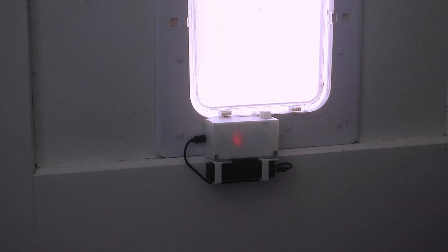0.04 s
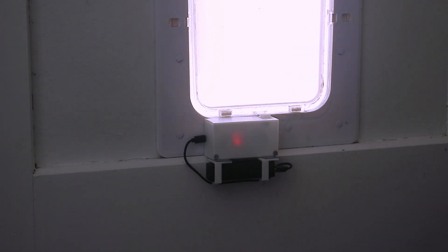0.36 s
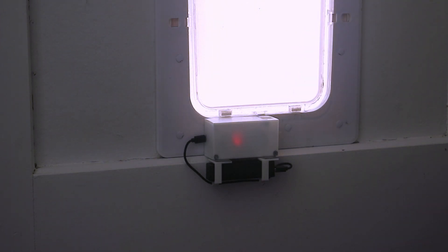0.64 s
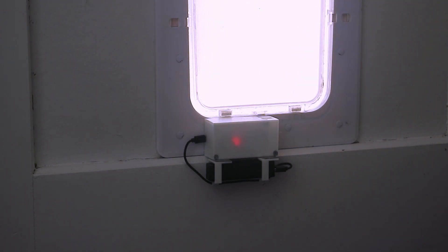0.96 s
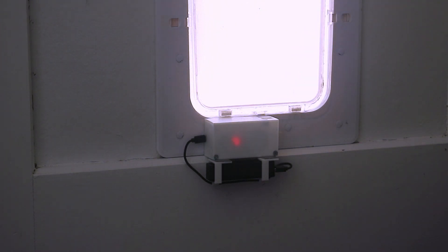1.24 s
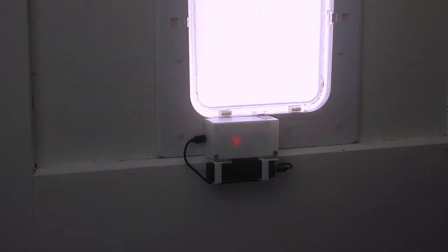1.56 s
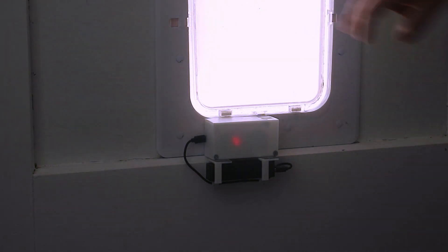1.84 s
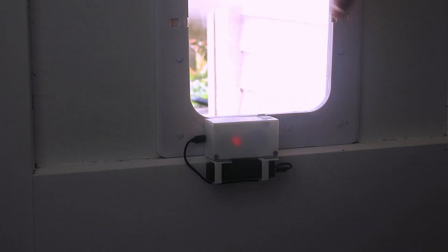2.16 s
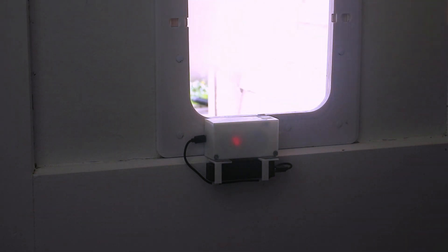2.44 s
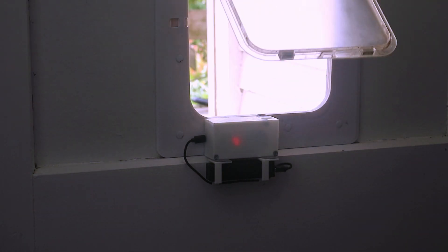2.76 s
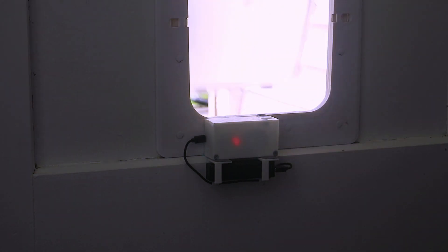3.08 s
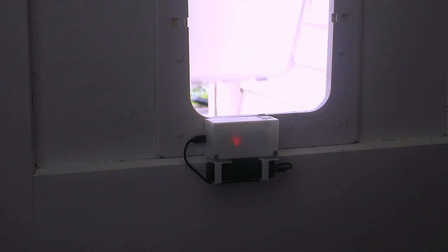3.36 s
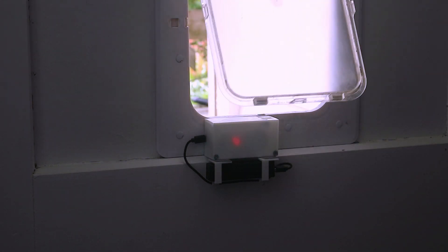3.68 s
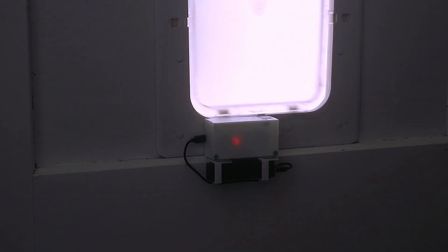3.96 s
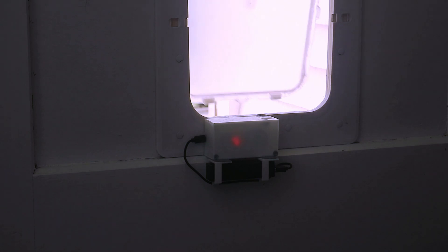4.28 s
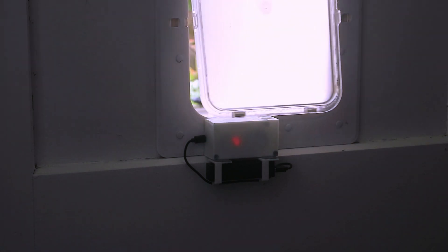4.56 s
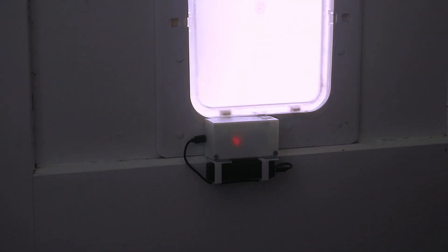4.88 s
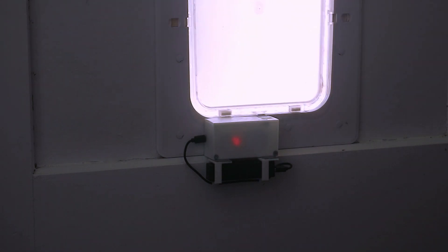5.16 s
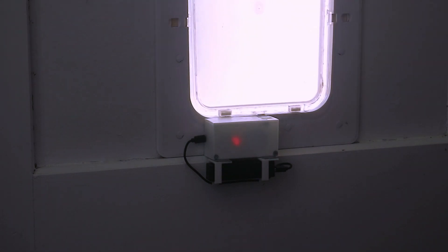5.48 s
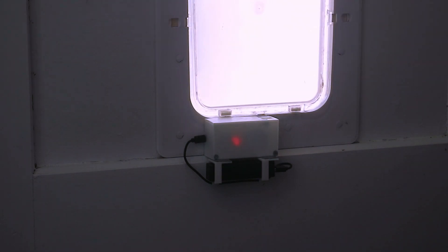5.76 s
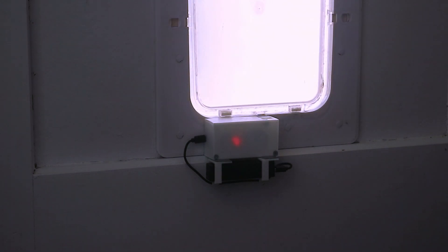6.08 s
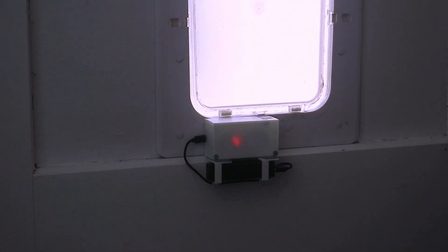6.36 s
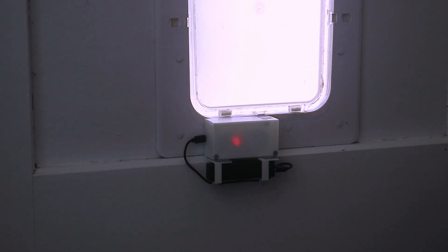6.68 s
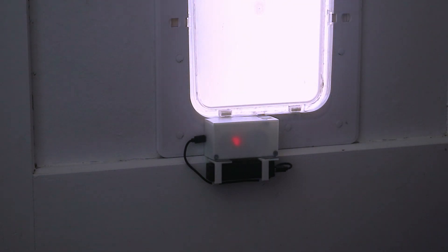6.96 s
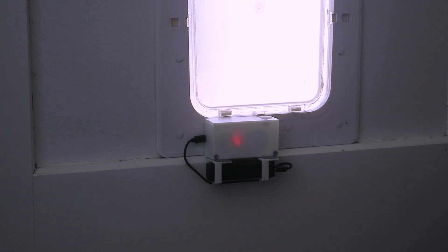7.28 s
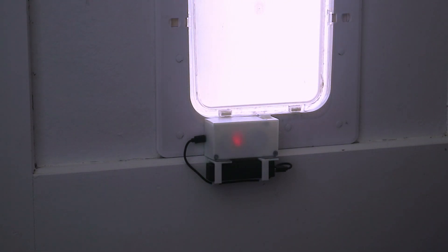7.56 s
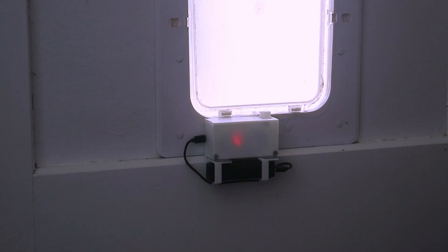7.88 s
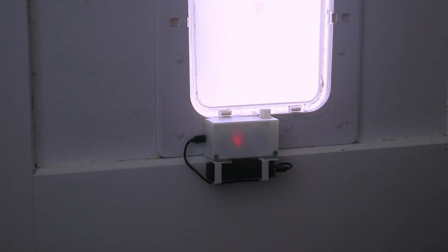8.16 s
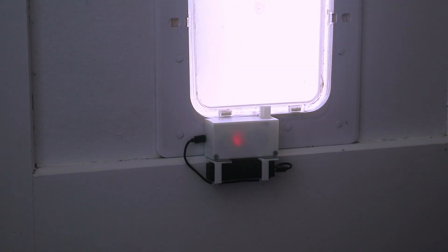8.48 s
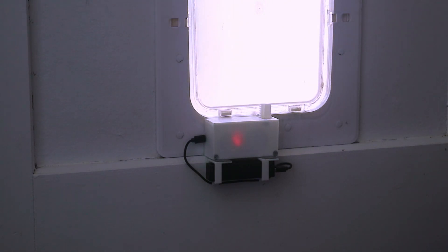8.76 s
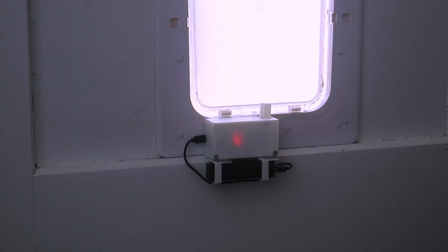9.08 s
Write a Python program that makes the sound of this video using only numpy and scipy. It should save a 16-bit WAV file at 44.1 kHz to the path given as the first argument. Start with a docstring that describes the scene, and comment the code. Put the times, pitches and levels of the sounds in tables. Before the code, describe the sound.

In a quiet room a small lock motor hums faintly and stops with a tick. A plastic cat flap is shoved open with a hollow thud and swings back and forth, clacking through its frame five times while the hinge rubs and briefly groans. It rattles to rest. After a pause the motor hums again and ends in a small click. Soft room air and a faint steady whir lie underneath, heard in stereo.

```python
"""A small lock motor hums in a quiet room, drawing down the bolt of a plastic cat flap.
After a faint scuff the flap is shoved off its catch with a thud and swings in its door frame. The hinge
rubs on every swing and sometimes groans; at the bottom the flap clacks past the catch, chatters and
sways the door. It rattles to rest, and the motor raises the bolt until it clicks.
Two microphones hear it over still room air, a few soft tocks and the whir of the camera's body."""
import sys
import numpy as np
from scipy import signal
from scipy.fft import rfft, irfft
from scipy.io import wavfile
from scipy.ndimage import map_coordinates

SR = 44100
rng = np.random.default_rng(int(sys.argv[2]) if len(sys.argv) > 2 else 0)


def transcribe(u):
    """Save the signal u as a 16-bit wav file named by the first command-line argument.

    u: samples, shape (n,) or (channels, n), limited to [-1, 1]; the rate is SR.
    q: integer samples, one column per channel.
    """
    v = np.clip(np.atleast_2d(u).T, -1, 1)
    q = np.round(v * 32767).astype(np.int16)
    wavfile.write(sys.argv[1], SR, q)


N = 402633
TIME = np.arange(N) / SR
DOOR_HZ = 37.99  # lowest mode of the door
SHOVE_S = 2.0684

# where the flap's sound sits between the microphones: (frequency [Hz], left minus right [dB])
PANEL_BALANCE = [(90.0, 4.5), (160.0, -4), (270.0, -23), (450.0, -4.5), (800.0, 1), (1500.0, 0.5)]
# the flap's swings, from one turning point to the next: (start [s], end [s], rubbing level [dB])
SWING_SPANS = [(2.128, 2.49, -44), (2.452, 2.892, -36), (2.995, 3.366, -37), (3.403, 3.883, -38),
               (3.919, 4.343, -40.5), (4.313, 4.765, -40), (4.811, 5.454, -50)]
# its passes through the frame: (time [s], first clack [dB], second clack [dB], hardness [dB/octave],
# loss per rebound [dB], door sway [dB])
FRAME_PASSES = [(2.644, -25, -43, -1, 3, -63), (3.1312, -28, -29.5, 0.94, 11, -54),
                (3.6054, -27.5, -29, -0.44, 6, -51.5), (4.081, -28.5, -30.5, 0.66, 1.5, -49),
                (4.5341, -29, -33.5, 0.3, 1.5, -50)]


def amp(db):
    """Decibels to amplitude."""
    return 10 ** (np.asarray(db) / 20)


def unit(x):
    """Scale to unit RMS."""
    return x / np.sqrt(np.mean(abs(x) ** 2) + 1e-20)


def curve(points, hz):
    """Interpolate (frequency, value) points along log frequency."""
    f, value = np.transpose(points)
    return np.interp(np.log(hz + 1), np.log(f + 1), value)


def octaves(hz, knee_hz=800):
    """Octaves above the knee where a harder contact starts to sound brighter."""
    return np.log2(np.maximum(hz / knee_hz, 1))


def resonance_db(hz, centre_hz, width_hz):
    """One broad peak, 6 dB down at the edges of its width."""
    return -20 * np.log10(1 + (2 * (hz - centre_hz) / width_hz) ** 2)


def add(mix, s, sound):
    """Mix a sound in at s seconds."""
    part = mix[:, max(round(s * SR), 0):][:, :sound.shape[-1]]
    part += sound[..., :part.shape[1]]


def drift(count, size):
    """Random wander of unit RMS, smoothed over about size samples."""
    noise = rng.standard_normal(count + 2 * size)
    return unit(signal.oaconvolve(noise, signal.windows.hann(2 * size + 1), "valid"))


def tone(hz):
    """A sine of unit RMS that follows a moving pitch."""
    return np.sqrt(2) * np.sin(2 * np.pi * np.cumsum(hz) / SR)


def causal(gain):
    """The most compact pulse with this spectrum, silent before it starts."""
    spectrum = np.exp(np.conj(signal.hilbert(np.log(gain))))
    return np.fft.ifft(spectrum).real[..., :gain.shape[-1] // 2]


def colour(x, db_at, size=16384):
    """A causal filter of unit power gain, shaped by a dB curve."""
    hz = abs(np.fft.fftfreq(size, 1 / SR))
    gain = np.maximum(unit(amp(db_at(hz))), 1e-5)
    return signal.oaconvolve(x, np.atleast_2d(causal(gain)), axes=1)[:, :x.shape[1]]


def stereo_noise(size, diffuseness=1):
    """White noise at the two microphones: shared in the bass, less so in the treble."""
    # likeness of the microphones for sound from the door: (frequency [Hz], coherence [0-1])
    coherence = [(90, 0.98), (160, 0.8), (600, 0.84), (2000, 0.49), (5000, 0.1)]
    left, other = rfft(rng.standard_normal((2, size)))
    alike = np.clip(curve(coherence, np.fft.rfftfreq(size, 1 / SR)), 0, 1) ** diffuseness
    right = alike * left + np.sqrt(1 - alike ** 2) * other
    return irfft(np.array([left, right]), size)


def ring(t60, room_db, crack_db, damping=0.12, bite=0.36, bite_s=0.0019, size=32768, count=4):
    """One blow: cracks off the frame, dense ringing that dies sooner in the treble, the room's tail."""
    # reverberation of the room: (frequency [Hz], t60 [s])
    room_decay = [(95, 1), (212, 0.85), (424, 0.51), (1700, 0.37), (6900, 0.43)]
    hz, t, noise = signal.stft(stereo_noise(size), SR, nperseg=256)
    hz = hz[:, None]
    plastic = amp(-60 * t / t60 * (1 + damping * octaves(hz)))
    contact = bite * np.minimum(octaves(hz, 1900), 1) * np.exp(-t / bite_s)  # a brief spit of treble
    room = amp(room_db - 60 * t / curve(room_decay, hz))
    out = signal.istft(noise * np.hypot(plastic + contact, room), SR, nperseg=256)[1][:, :size]
    order = np.arange(count)
    slots = order + rng.random(count) * np.minimum(order, 1)
    arrivals = (slots / count * 0.009 * SR).astype(int)  # within the first 9 ms
    cracks = amp(crack_db) * rng.choice([-1, 1], count) / np.sqrt(order + 1)
    for side in out:
        side[arrivals + rng.integers(0, 4, count)] += cracks
    return out


def room_air(level_db=-63, drone_hz=565, width_hz=110, drone_db=8, right_db=3):
    """Soft room tone with one broad drone; its low part leans to the right microphone."""
    # still air of the room: (frequency [Hz], relative level [dB])
    air_spectrum = [(20, -21), (45, -6.5), (110, -3), (900, -1.5), (1300, -6.5), (3500, -15), (6000, -21),
                    (10000, -28.5), (12500, -33.5), (14000, -54)]

    def shape_db(hz):
        drone = drone_db * np.exp(-(2 * (hz - drone_hz) / width_hz) ** 2)
        lean = np.array([[-.5], [.5]]) * right_db / (1 + (hz / 900) ** 2)
        return curve(air_spectrum, hz) + drone + lean
    return amp(level_db) * colour(stereo_noise(N, diffuseness=6.6), shape_db)


def electronics_whine(hz=15230, waver_hz=25, level_db=-97.5):
    """The electronics give a faint, unsteady line at the top of hearing."""
    return amp(level_db) * tone(hz + waver_hz * drift(N, size=400))


def camera_whir(level_db=-57, right_db=1):
    """A steady whir in the camera's body shakes the two microphones in opposite directions."""
    # vibration of the body: (frequency [Hz], relative level [dB])
    whir_spectrum = [(30, -30), (190, -0.5), (480, -3), (525, 8.5), (605, -1.5), (650, -5), (2200, -21.5),
                     (12000, -49)]
    whir = colour(rng.standard_normal((1, N)), lambda hz: curve(whir_spectrum, hz))
    return whir * amp(level_db) * np.array([amp([-right_db]), -amp([right_db])])


def tocks(width_hz=260):
    """Dull taps, each ringing in one broad resonance."""
    # soft hollow taps: (time [s], level [dB], pitch [Hz])
    taps = [(.066, -55.5, 940), (.934, -60, 530), (6.349, -56.5, 950), (8.35, -57, 900)]
    out = np.zeros((2, N))
    for s, db, pitch_hz in taps:
        tap = ring(t60=0.24, room_db=-24, crack_db=-5)
        add(out, s, amp(db) * colour(tap, lambda hz: resonance_db(hz, pitch_hz, width_hz), size=4096))
    return out


def scuff(s=1.596, level_db=-65.5, centre_hz=3300, skirt_db=6.5, rise_s=0.015, size=8192):
    """A dry brush of treble noise that swells quickly and fades."""
    out = np.zeros((2, N))
    age = np.arange(size) / SR / rise_s
    brush = colour(stereo_noise(size), lambda hz: -skirt_db * np.log2((hz + 1) / centre_hz) ** 2, 1024)
    add(out, s, amp(level_db) * brush * age * np.exp(1 - age))
    return out


def lock_motor(waver=0.00481, ramp_s=0.022, gear_hz=2150, gear_width_hz=134, gear_db=-7.5):
    """Wavering hum, whirr and singing gears while the bolt moves; lifting it adds a rumble."""
    # bolt down, then up: (start [s], end [s], hum [dB], whirr [dB], rumble [dB])
    runs = [(-.1, 0.996, -65.5, -73.5, -95), (7.248, 9.065, -68.5, -71, -73.5)]
    # tones of the motor: (frequency [Hz], relative level [dB])
    hum_tones = [(247.6, -3.5), (710.6, -18)]
    # noise of the gears: (frequency [Hz], relative level [dB])
    whirr_spectrum = [(60, -28), (300, -13), (900, -8), (1300, -10.5), (2400, -5.5), (2900, -16),
                      (5000, -28), (12000, -48)]
    speed = 1 + waver * drift(N, size=4000)
    hum = amp([[-5], [3]]) * sum(amp(db) * tone(hz * speed) for hz, db in hum_tones)  # to the right
    noise = stereo_noise(N, diffuseness=8.5)
    gears = colour(noise, lambda hz: -10 * np.log10(1 + (2 * (hz - gear_hz) / gear_width_hz) ** 4))
    whirr = colour(noise, lambda hz: curve(whirr_spectrum, hz)) + amp(gear_db) * gears
    rumble = colour(noise, lambda hz: resonance_db(hz, centre_hz=125, width_hz=60))
    out = np.zeros((2, N))
    for start, end, hum_db, whirr_db, rumble_db in runs:
        running = np.clip(np.minimum(TIME - start, end - TIME) / ramp_s, 0, 1)
        out += running * (amp(hum_db) * hum + amp(whirr_db) * whirr + amp(rumble_db) * rumble)
    return out


def lock_clicks():
    """Small clicks ring in the lock's plastic housing."""
    # contacts in the lock: (time [s], level [dB], hardness [dB/octave])
    ticks = [(0.934, -53.5, -8), (7.244, -55, -13), (7.346, -57, -2.5), (9.019, -43.5, -4),
             (9.028, -46, -3), (9.037, -47.5, 0)]
    # colour of the housing: (frequency [Hz], relative level [dB])
    housing = [(100, -24), (400, -1), (680, -8.5), (880, 8), (1150, -7), (1700, -1.5), (2200, 1),
               (2750, -7.5), (3400, -14.5), (13000, -37)]
    out = np.zeros((2, N))
    for s, db, hardness_db in ticks:
        click = ring(t60=0.1, room_db=-11.5, crack_db=17)
        tilt = amp(hardness_db * octaves(np.fft.rfftfreq(click.shape[1], 1 / SR)))
        add(out, s, amp(db) * irfft(rfft(click) * tilt)[:, :SR // 2])
    return colour(out, lambda hz: curve(housing, hz))


def door_sway(rise_s=0.092, waver_hz=0.39, settle_at_s=4.965, settle_length_s=0.39, settle_db=-47):
    """The door's lowest mode swells and dies with each pass, and again as the flap settles."""
    swell = np.zeros((2, N))
    age = np.arange(SR) / SR / rise_s
    for s, *_, sway_db in FRAME_PASSES:
        add(swell, s, amp(sway_db) * age * np.exp((1 - age ** 2) / 2))
    add(swell, settle_at_s, amp(settle_db) * signal.windows.tukey(round(settle_length_s * SR), .9))
    return swell * tone(DOOR_HZ + waver_hz * drift(N, size=6000))


def lingering_tones(source, left_db=-12, waver_hz=1.32):
    """Low resonances store some of the flap's energy and let it go slowly."""
    # tones that hang in the room: (frequency [Hz], t60 [s], gain [dB])
    resonances = [(185.6, 2.27, -19.5), (228.3, 1.18, -15), (347.6, 1.52, -19)]
    power = (source ** 2).mean(0)
    out = np.zeros(N)
    for hz, t60, db in resonances:
        retained = amp(-60 / (t60 * SR)) ** 2
        stored = signal.lfilter([1 - retained], [1, -retained], power)
        out += amp(db) * np.sqrt(stored / 2) * tone(hz + waver_hz * drift(N, size=4000))
    return amp([[left_db], [0]]) * out


def hinge_groans(jitter=0.05, roughness=0.35, left_db=-9, right_db=7):
    """As the flap turns back, uneven slips lock for a moment into a rough falling tone."""
    # groans: (time [s], length [s], start pitch [Hz], end pitch [Hz], level [dB], second harmonic [dB])
    groans = [(2.474, 0.066, 283, 249, -47, 2.5), (2.528, 0.056, 264.5, 244, -42.5, -12),
              (2.975, 0.078, 256, 224, -40.5, -13), (3.404, 0.073, 267, 225, -43.5, -9.5)]
    out = np.zeros((2, N))
    for s, length, start_hz, end_hz, db, octave_db in groans:
        n = round(length * SR)
        hz = np.linspace(start_hz, end_hz, n) * (1 + jitter * drift(n, size=120))
        grip = (1 + roughness * drift(n, size=120)) * signal.windows.tukey(n, .9)
        groan = grip * (tone(hz) + amp(octave_db) * tone(2 * hz))
        add(out, s, amp([[db + left_db], [db + right_db]]) * groan)
    return out


def rubbing_force(attack_s=0.074, sag_db_per_s=6.5, release_s=0.15):
    """Rubbing builds as the flap gathers speed, eases through the swing and dies as it climbs."""
    force = np.zeros(N)
    for start, end, db in SWING_SPANS:
        attack = np.clip((TIME - start) / attack_s, 0, 1)
        release = np.clip((end - TIME) / release_s, 0, 1) ** 2
        force += attack * release * amp(db - sag_db_per_s * np.maximum(TIME - start, 0))
    return force


def hinge_rub(slips_per_s=380, spread_db=2, spots=4):
    """A stream of tiny uneven slips, at several spots of the hinge, shakes the flap."""
    # colour of the rubbing: (frequency [Hz], relative level [dB])
    rub_spectrum = [(95, -4.5), (212, 6), (424, -2.5), (850, -1), (1700, -13.5), (6900, -26)]
    force = rubbing_force()
    out = np.zeros((2, N))
    for _ in range(spots):
        sizes = amp(spread_db * np.minimum(rng.exponential(1, N), 4)) * rng.choice([-1, 1], N)
        slips = (rng.random(N) < slips_per_s / spots / SR) * sizes
        body = ring(t60=0.11, room_db=-7, crack_db=17.5)
        body /= np.linalg.norm(body[0])
        out += signal.oaconvolve((force * unit(slips))[None], body, axes=1)[:, :N]
    return colour(out, lambda hz: curve(rub_spectrum, hz), size=4096) / np.sqrt(spots)


def swing_bend(sound, pitch_share=0.02985):
    """The resonances sag from sharp to flat over each swing."""
    lead_s = np.zeros(N)
    for start, end, _ in SWING_SPANS:
        progress = np.clip((TIME - start) / (end - start), 0, 1)
        lead_s += pitch_share * (end - start) * progress * (1 - progress)
    return np.array([map_coordinates(side, [(TIME + lead_s) * SR], order=3) for side in sound])


def strike(db, hardness_db, loss_db, bass_db=-8, body_db=0, body_hz=560, softening_db=2.47):
    """A blow on the plastic rebounds once per sway of the door, weaker and duller every time."""
    hz = abs(np.fft.fftfreq(1024, 1 / SR))
    # each contact point favours other bands of the panel
    spot_db = 0.5 * np.sin(2 * np.pi * (np.log2(hz + 300) * rng.uniform(1, 2) + rng.random()))
    hollow_db = body_db * np.exp(-np.log2((hz + 1) / body_hz) ** 2)
    blows = np.zeros((1, SR // 4))
    for rebound in range(6):
        tilt_db = (hardness_db - rebound * softening_db) * octaves(hz) + bass_db / (1 + (hz / 250) ** 2)
        pulse = amp(db - rebound * loss_db) * causal(amp(tilt_db + spot_db + hollow_db))
        delay_s = (rebound + min(rebound, 1) * rng.normal(0, 0.02)) / DOOR_HZ
        add(blows, delay_s, pulse)
    body = ring(t60=0.21, room_db=-12.5, crack_db=15.5, damping=0.22, bite=0.81, bite_s=0.0044)
    return signal.fftconvolve(blows, body, axes=1)


def boom(rise_s=0.0047, left_db=-7, right_db=2):
    """The shove sets the low modes of the held flap ringing."""
    # the flap while still pressed on the catch: (frequency [Hz], t60 [s], level [dB])
    held_modes = [(87, 0.162, -29), (218, 0.19, -24.5), (377, 0.14, -17.5), (480, 0.094, -26),
                  (1009, 0.056, -18.5)]
    t = np.arange(SR // 2) / SR
    tones = sum(amp(db - 60 * t / t60) * np.sin(2 * np.pi * hz * t) for hz, t60, db in held_modes)
    out = np.zeros((2, N))
    add(out, SHOVE_S, amp([[left_db], [right_db]]) * np.minimum(t / rise_s, 1) * tones)
    return out


def shove(thump_after_s=0.0074):
    """A hand snaps the flap off its catch and damps it; the hand's weight follows as a dull thump."""
    # colour of the held flap: (frequency [Hz], relative level [dB])
    held_spectrum = [(55, -17.5), (85, 0.5), (130, -2.5), (200, 2), (290, -5), (400, 9.5), (700, 0),
                     (980, 8), (1350, 0), (2200, -3.5), (2700, 0), (3200, -9), (7000, -22), (10500, -34),
                     (14500, -50)]
    out = np.zeros((2, N))
    add(out, SHOVE_S, strike(db=-28, hardness_db=0.43, loss_db=24, bass_db=16.5))
    add(out, SHOVE_S + thump_after_s, strike(db=-26, hardness_db=-4.5, loss_db=3.5, bass_db=6.5))
    sides = np.array([[.5], [-.5]])
    return colour(out, lambda hz: curve(held_spectrum, hz) + sides * curve(PANEL_BALANCE, hz), size=4096)


def clacks(leave_after_s=0.052, clear_after_s=0.108):
    """On each pass the flap hits the catch, leaves it and clears the frame; at last it rattles to rest."""
    # knocks from the hand after the shove, from play in the hinge and from clipping the catch: # (time [s],
    # level [dB], hardness [dB/octave], loss per rebound [dB])
    knocks = [(2.192, -30.5, -9, 4), (2.2907, -43.5, -3.5, 15), (2.3272, -42, -5.5, 9),
              (2.4147, -42.5, -7, 18), (2.5362, -35.5, -5.5, 25), (2.5623, -30.5, -4.5, 1),
              (2.669, -30.5, -1, 3.5), (3.0252, -37, -6, 22), (3.2115, -41, -3, 14), (3.2405, -37, -4, 18),
              (3.265, -35.5, -3.5, 14), (3.5238, -36.5, -6.5, 3), (3.630, -31, 0, 22),
              (4.0925, -30, -2.5, 20), (4.1584, -43, 4, 16), (4.2147, -29.5, -6.5, 21), (4.55, -36, 2, 24),
              (4.5623, -31, 1.5, 2.5), (4.625, -43, 3, 18), (4.642, -32, -0.5, 22), (4.669, -33, -1.5, 22),
              (4.855, -46.5, -15.5, 14), (4.935, -50, -8, 15)]
    # hollow rattle on the catch:
    # (time [s], level [dB], hardness [dB/octave], loss per rebound [dB], hollow body [dB])
    rattle = [(5.0116, -26.5, -5.5, 1.5, -3), (5.024, -35, 0, 24, 10.5), (5.0373, -37.5, 3.5, 5, 9),
              (5.064, -32.5, -3, 0.5, 0.5), (5.1123, -33, 0.5, 3.5, 2), (5.139, -32.5, 1.3, 5, 6.5),
              (5.176, -29, -3.5, 17, -2), (5.2187, -25.5, -4.5, 6, -0.5), (5.2873, -32, 0, 12, 4),
              (5.318, -31, -9.5, 15, 4), (5.355, -29.5, -3, 21, 0), (5.371, -31.5, -9, 13.5, 6)]
    out = np.zeros((2, N))
    for s, first_db, second_db, hardness_db, loss_db, _ in FRAME_PASSES:
        add(out, s, strike(first_db, hardness_db, loss_db))
        add(out, s + leave_after_s, strike(second_db, hardness_db, loss_db=6.5, bass_db=-4.5))
        add(out, s + clear_after_s, strike(db=-34.5, hardness_db=-7, loss_db=6.5))
    for s, db, hardness_db, loss_db in knocks:
        add(out, s, strike(db, hardness_db, loss_db))
    for s, db, hardness_db, loss_db, body_db in rattle:
        add(out, s, strike(db, hardness_db, loss_db, bass_db=-4.5, body_db=body_db, softening_db=5))
    return out


def panel_db(hz):
    """Response of flap and door at the left and right microphones."""
    # broad colour of flap and door: (frequency [Hz], relative level [dB])
    panel_spectrum = [(60, -16.5), (85, 4.5), (130, -4.5), (200, -10.5), (350, -1), (600, -7.5), (1000, -5),
                      (1500, -8), (2800, -4), (4800, -14.5), (7000, -20.5), (10500, -36.5), (14500, -56)]
    # resonances of flap, frame and door: (frequency [Hz], width [Hz], height [dB], left minus right [dB])
    modes = [(157.3, 10.5, 10.5, -13), (192, 14.6, 15.5, 5.5), (222.8, 27, 14, -3.5), (312, 17, 10.5, 4),
             (346.6, 6.8, 12, -4.5), (388.4, 20, 9, -7), (455, 17, 7, -14.5), (478.7, 27.3, 19, -0.5),
             (626.4, 17.7, 19.5, -5), (770, 42, 10.5, -12.5), (864, 12.5, 17, 6), (914, 15, 17, -6.5),
             (986, 50, 15.5, -5), (1157, 123, 13, 0), (1224, 19, 17, 3.5), (1421, 42, 8.5, 5.5),
             (1547, 43, 8, 6), (1711, 43, 15.5, 0), (1938, 33, 8.5, 8.5), (2410, 31, 4.5, -10),
             (2524, 28, 8, -1), (2767, 130, 6, 1.5), (3193, 91, 4, -1.5), (4020, 72, 5.5, 1)]
    sides = np.array([[.5], [-.5]])
    peaks = sum(amp(db + sides * pan_db) ** 2 / (1 + (2 * (hz - centre_hz) / width_hz) ** 2)
                for centre_hz, width_hz, db, pan_db in modes)
    return curve(panel_spectrum, hz) + sides * curve(PANEL_BALANCE, hz) + 10 * np.log10(1 + peaks)


def flap(clack_db=1, rub_db=-9.5):
    """Clacks and rubbing sound through the same panel and join the shove; a few low tones hang on."""
    # how far the left microphone leads for the flap: (frequency [Hz], phase [rad])
    left_lead = [(160, 0), (400, 0.58), (700, 0), (1100, 0.67), (2000, 0.2), (4500, 0.91)]
    blows = amp(clack_db) * colour(clacks(), panel_db)
    rubbing = amp(rub_db) * swing_bend(colour(hinge_rub(), panel_db))
    out = blows + rubbing + shove()
    phase = curve(left_lead, np.fft.rfftfreq(N, 1 / SR))
    out[0] = irfft(rfft(out[0]) * np.exp(1j * phase), N)
    return out + lingering_tones(out)


def scene():
    """The flap, its door and its lock over the room's quiet background."""
    at_door = flap() + boom() + hinge_groans() + door_sway() + lock_motor() + lock_clicks()
    return at_door + tocks() + scuff() + room_air() + camera_whir() + electronics_whine()


def record(dry):
    """The recorder cuts the treble above 15.7 kHz."""
    lowpass = signal.firwin(511, 15700, window=("kaiser", 9), fs=SR)
    return signal.oaconvolve(dry, lowpass[None], "same")


dry = scene()
out = record(dry)
transcribe(out)
```